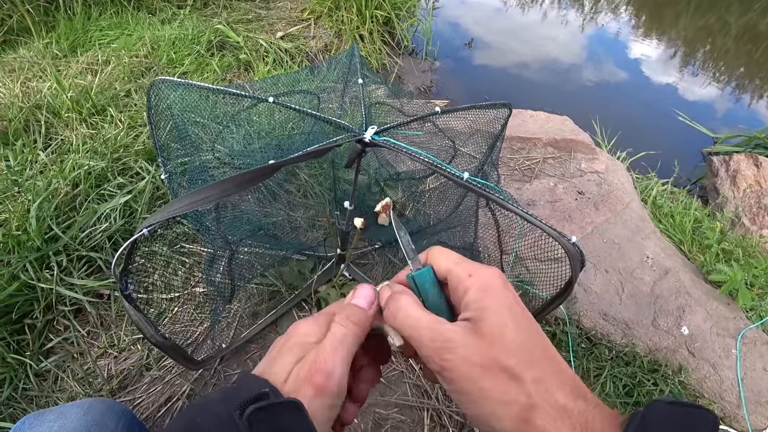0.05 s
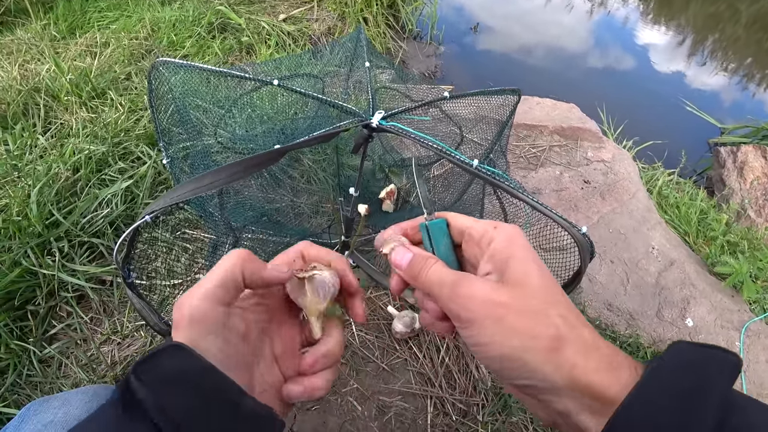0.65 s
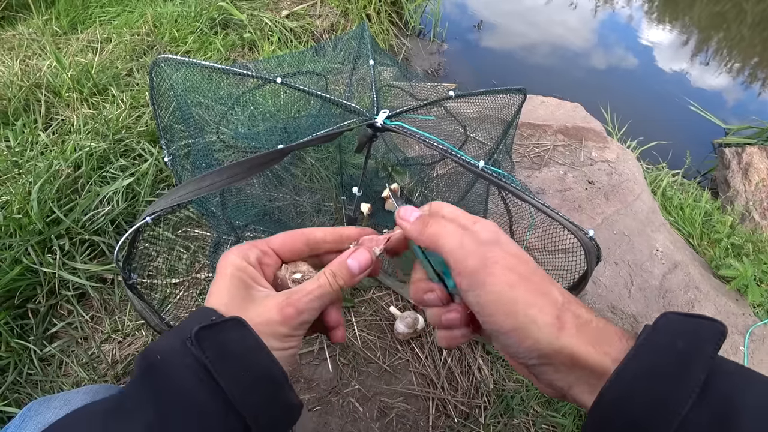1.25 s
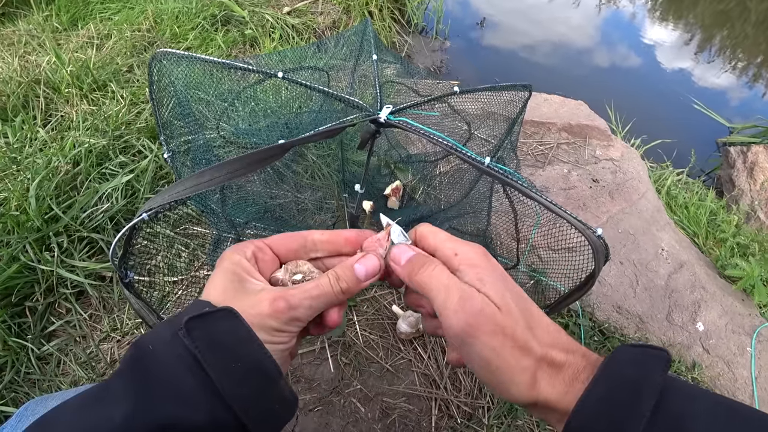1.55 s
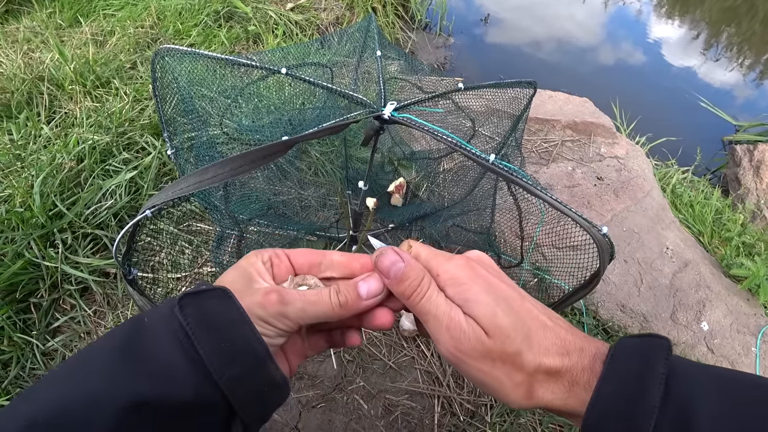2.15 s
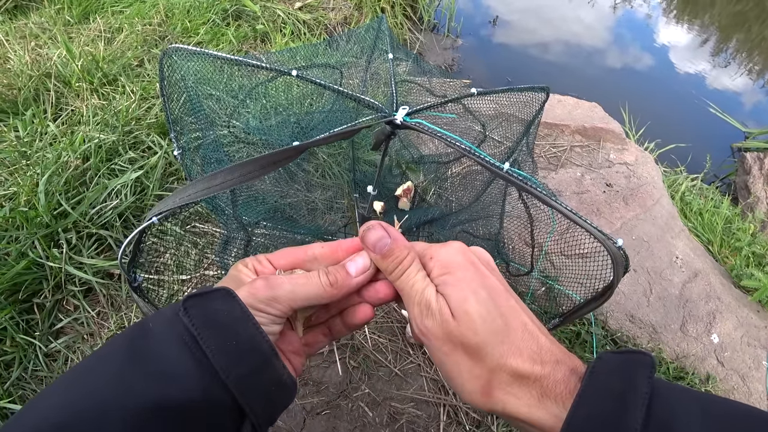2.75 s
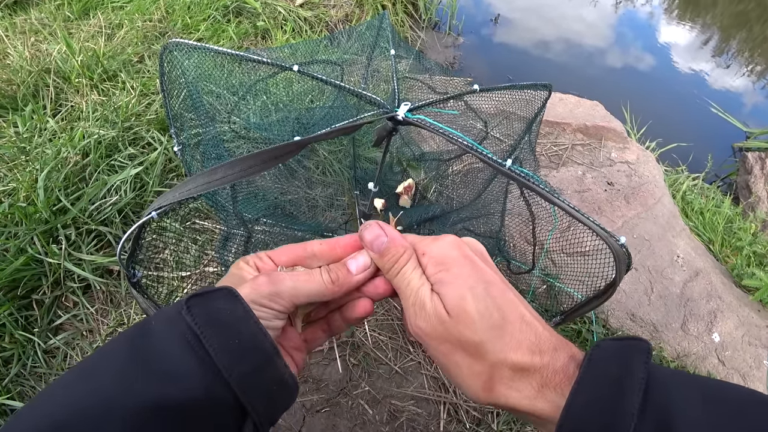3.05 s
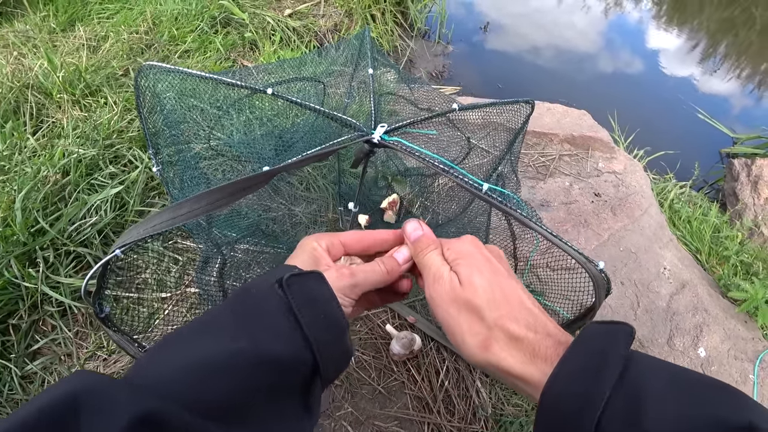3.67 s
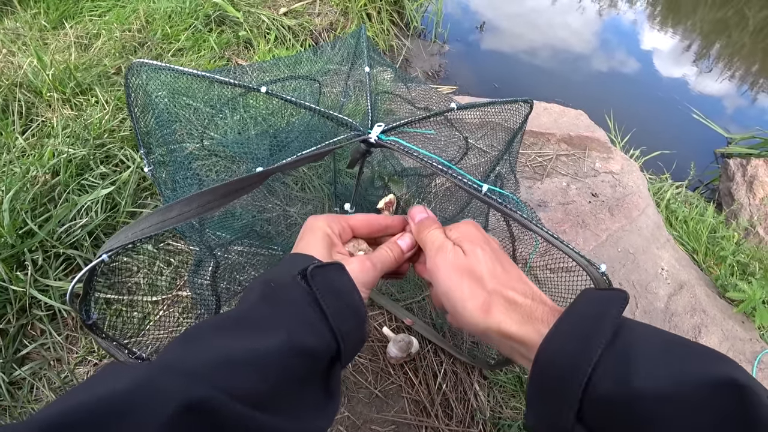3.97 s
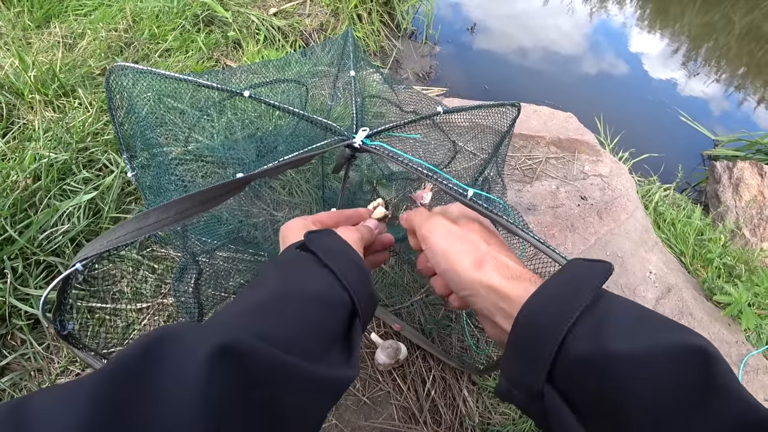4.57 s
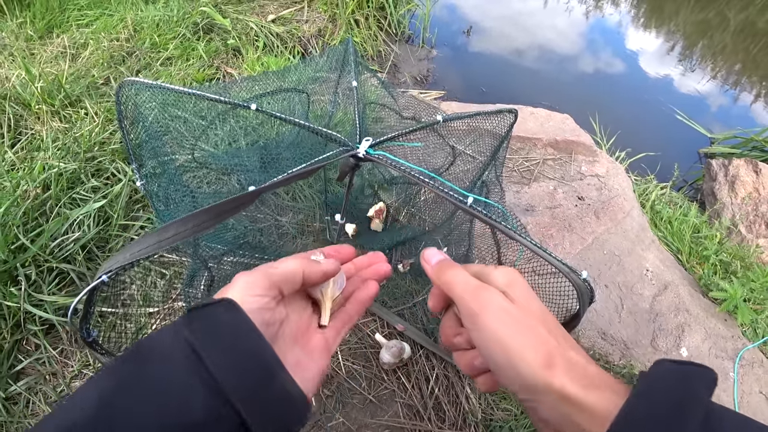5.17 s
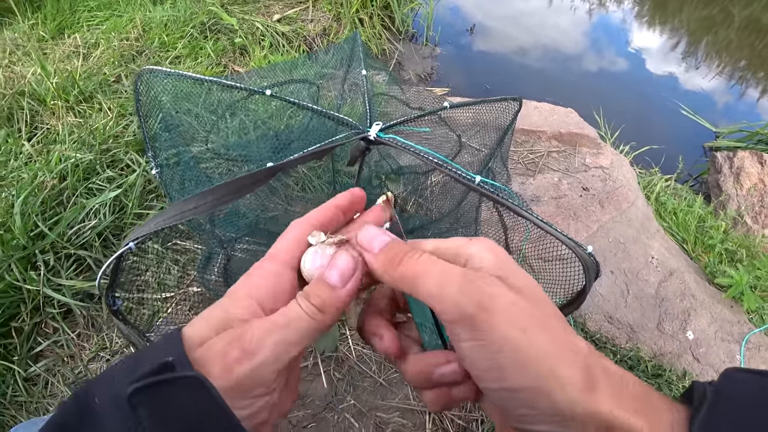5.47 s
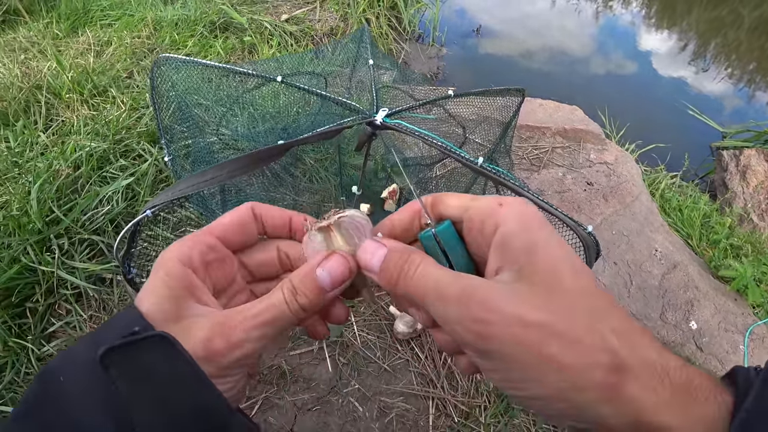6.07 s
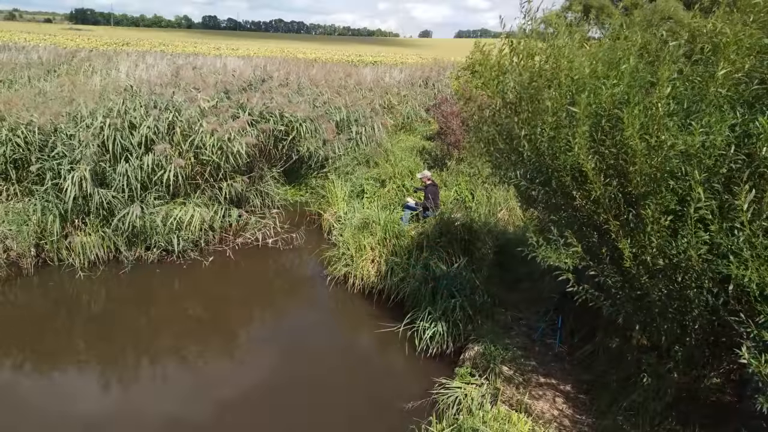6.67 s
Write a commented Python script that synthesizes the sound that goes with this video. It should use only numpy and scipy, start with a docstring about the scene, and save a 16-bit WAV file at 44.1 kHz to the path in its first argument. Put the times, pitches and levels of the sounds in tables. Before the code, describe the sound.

Dry garlic skin snaps and crackles as it is peeled with a knife close by, over rubbing jacket sleeves and light wind.

```python
"""Peeling garlic on a river bank

Garlic is peeled and cut with a small knife close to a body-worn camera. Dry skin snaps and tears
as its fibres break, the stalk rings, jacket sleeves rub and squeak, and light wind rumbles on the
microphone ports. Gain control ducks after the loudest snaps. Knocks ring the camera housing,
most of them near the end, where the handling gives way to quiet reeds."""
import sys
import numpy as np
from scipy import signal
from scipy.fft import rfft, irfft, next_fast_len
from scipy.io import wavfile
from scipy.ndimage import uniform_filter1d

SR = 44100
rng = np.random.default_rng(int(sys.argv[2]) if len(sys.argv) > 2 else 0)


def dump_mix(stems):
    """Bounce the given channels to the path in sys.argv[1] as a 16-bit WAV at rate SR."""
    frames = np.atleast_2d(stems).T  # one column per channel
    limited = np.clip(frames, -1, 1)  # hard clip at full scale
    pcm = np.round(limited * 32767).astype(np.int16)
    wavfile.write(sys.argv[1], SR, pcm)


N = 305389
TIME_S = np.arange(N) / SR


def from_db(db):
    """Decibels to gain."""
    return 10 ** (np.asarray(db) / 20)


def rms_one(x):
    """Scale to rms 1."""
    return x / np.sqrt(np.mean(x ** 2) + 1e-20)


def in_time(rows):
    """Columns of a time curve at every sample."""
    time_s, *columns = np.transpose(rows)
    return [np.interp(TIME_S, time_s, column) for column in columns]


def add(out, start_s, sound):
    """Mix a sound in from start_s."""
    start = max(round(start_s * SR), 0)
    out[..., start:start + sound.shape[-1]] += sound[..., :N - start]


def band(x, low_hz, high_hz, order=2):
    """Causal band-pass."""
    return signal.sosfilt(signal.butter(order, [low_hz, high_hz], "band", fs=SR, output="sos"), x)


def resonance(x, hz, width_hz):
    """Two-pole resonance, peak gain 1."""
    r = np.exp(-np.pi * width_hz / SR)
    feedback = [1, -2 * r * np.cos(2 * np.pi * hz / SR), r * r]
    return signal.lfilter(np.array([1, 0, -1]) * (1 - r * r) / 2, feedback, x)


def drift(rate_hz):
    """Random wander, rms 1."""
    knots = rng.standard_normal(int(N / SR * rate_hz) + 2)
    return rms_one(np.interp(TIME_S * rate_hz, np.arange(len(knots)), knots))


def coloured(x, spectrum):
    """Filter by a spectrum that rolls off past its ends; rms 1."""
    hz, db = np.transpose(spectrum)
    size = next_fast_len(N)
    bins_hz = np.maximum(np.arange(size // 2 + 1) * SR / size, 1)
    outside = np.maximum(np.maximum(hz[0] / bins_hz, bins_hz / hz[-1]), 1)
    gain = from_db(np.interp(np.log(bins_hz), np.log(hz), db)) / outside ** 2
    return rms_one(irfft(rfft(x, size) * gain, size)[..., :N])


def friction(count, slips_per_s, spread_db, hiss):
    """Tiny random slips over a smooth hiss; rms 1."""
    slips = (rng.random(count) < slips_per_s / SR) * rng.choice([-1, 1], count)
    sizes = from_db(spread_db * np.minimum(rng.exponential(1, count), 4))
    return rms_one(rms_one(slips * sizes) + hiss * rng.standard_normal(count))


def wind(trim_db=-1, flutter_db=1.5):
    """Bell-shaped gusts over a light breeze rumble on the microphone ports."""
    # gusts: peak_s, sigma_s, level_db
    gusts = [(0.135, 0.08, -43.5), (0.476, 0.041, -35), (0.737, 0.042, -43.5), (0.972, 0.037, -41.5),
             (2.65, 0.065, -39), (2.77, 0.061, -40), (2.939, 0.028, -34), (3.582, 0.092, -43.5),
             (3.88, 0.057, -37), (4.255, 0.076, -47), (4.568, .04, -45.5), (5.308, 0.064, -43),
             (5.59, 0.085, -40), (6.03, 0.17, -36.5)]
    # breeze between gusts: time_s, level_db
    breeze = [(0, -52.5), (1.6, -53.5), (3.1, -51.5), (4.9, -48.5), (6.4, -49), (6.62, -70), (6.9, -61)]
    # rumble spectrum: freq_hz, gain_db
    spectrum = [(14, 1), (24, -1), (40, -4.5), (60, -12.5), (100, -22), (180, -35), (400, -60)]
    gust_power = sum(from_db(db) ** 2 * np.exp(-((TIME_S - peak_s) / sigma_s) ** 2)
                     for peak_s, sigma_s, db in gusts)
    envelope = np.sqrt(gust_power + from_db(in_time(breeze)[0]) ** 2)
    return envelope * from_db(trim_db + flutter_db * drift(22)) * coloured(rng.standard_normal(N), spectrum)


def foliage(bank_db=-59):
    """The soft, centred hush of the grassy bank fades out, leaving reeds across the water."""
    # air over the bank: freq_hz, gain_db
    bank_spectrum = [(100, 2.5), (250, -15), (380, -1.5), (480, -15), (850, -17), (1250, -37), (1800, -11),
                     (3200, -11.5), (5000, -23), (10000, -14.5), (12000, -14), (16000, -42)]
    # reed rustle: freq_hz, gain_db
    reed_spectrum = [(60, 3), (250, 1.5), (350, -0.5), (650, -3), (1000, -7), (2500, -8.5), (4000, -10),
                     (5000, -13), (7300, -13), (9000, -18.5), (11000, -16), (13000, -19), (16000, -31)]
    # reed loudness: time_s, level_db
    reed_levels = [(6.2, -55), (6.43, -54.5), (6.55, -56), (6.7, -54.5), (6.9, -53.5)]

    def hush(spectrum, side_db):
        mid, side = coloured(rng.standard_normal((2, N)), spectrum)
        return mid + from_db(side_db) * side * [[1], [-1]]

    bank = from_db(bank_db) * np.interp(TIME_S, [6.25, 6.46], [1, 0]) * hush(bank_spectrum, side_db=-47)
    return bank + from_db(in_time(reed_levels)[0]) * hush(reed_spectrum, side_db=-18.5)


def stroke_gains(arch=0.44, fidget_bright_db=3.5):
    """Gains of rub, swish and hiss: each stroke speeds up and slows down, over constant fidgeting."""
    # sleeve and finger strokes: start_s, length_s, rub_db, swish_rel_db, hiss_rel_db
    strokes = [(0, .11, -56, 7.5, 0.5), (0.08, .1, -60, 3.5, 3.5), (0.28, 0.29, -58.5, 5, 1.5),
               (0.53, 0.26, -54.5, 1.5, -1.5), (0.982, 0.59, -60.5, 2.5, -8), (1.24, 0.11, -59.5, 4.5, 2),
               (1.9, .24, -61, 0, -6), (2.45, 0.15, -60.5, -3.5, 1.5), (3.17, 0.2, -51, 1.5, -2),
               (3.28, .26, -49.5, -1.5, -4.5), (3.638, .33, -47.5, 1, -10), (3.92, 0.29, -49.5, -3.5, -4.5),
               (4.17, 0.19, -50.5, 2.5, -2), (4.41, 0.18, -51, -3, -8), (4.931, 0.1, -46.5, -0.5, -3),
               (5.0, .25, -54, 2, 5), (5.09, .2, -47.5, 4, -3), (5.19, .42, -54.5, 1, -6),
               (5.76, 0.29, -55, -1.5, -3.5)]
    # fingers shifting on the clove: time_s, rub_db
    fidget = [(0.2, -71), (1.0, -62.5), (1.7, -68), (2.2, -72), (2.75, -72), (3.05, -77), (3.4, -63.5),
              (4.4, -63), (4.65, -71.5), (4.85, -62.5), (5.7, -64), (6.25, -70), (6.42, -69)]
    gains = from_db(in_time(fidget)[0] + np.array([[0], [fidget_bright_db], [fidget_bright_db]]))
    for start_s, length_s, rub_db, swish_rel_db, hiss_rel_db in strokes:
        during = (TIME_S > start_s) & (TIME_S < start_s + length_s)
        speed = np.abs(np.sin(np.pi * (TIME_S[during] - start_s) / length_s)) ** arch
        peaks = from_db(rub_db + np.array([[0], [swish_rel_db], [hiss_rel_db]]))
        gains[:, during] = np.hypot(gains[:, during], speed * peaks)
    return gains


def sleeves(flutter_db=1.66, tick_db=-7, side_db=-26):
    """Cloth and fingers slide: dull rub, grainy swish and fine hiss with stray ticks of dry skin."""
    # spectra of the three friction layers: freq_hz, gain_db
    rub_spectrum = [(70, 2), (130, 5), (220, -3), (300, -5), (405, 2.5), (490, -3), (740, 2.5), (1150, -1),
                    (1400, -2.5), (1700, -6.5), (2150, -7), (3000, -27)]
    swish_spectrum = [(1700, -8.5), (2500, -3), (3200, -2), (3800, 2), (4400, -2.5), (5100, -0.5),
                      (5800, 2.5), (6600, 0.5), (7500, 2.5), (9000, 0), (10500, -27)]
    hiss_spectrum = [(8000, -44), (9800, 6.5), (11500, 1), (13500, 0.5), (15500, -6), (16500, -10)]
    rub_gain, swish_gain, hiss_gain = stroke_gains()
    weave = friction(N, slips_per_s=3500, spread_db=3, hiss=1.15) * from_db(flutter_db * drift(70))
    rub = coloured(friction(N, slips_per_s=900, spread_db=2.5, hiss=1.22), rub_spectrum)
    side = from_db(side_db) * coloured(rng.standard_normal(N), rub_spectrum) * [[1], [-1]]
    ticks = rms_one(band(friction(N, slips_per_s=89, spread_db=0, hiss=0), 5600, 15000))
    hiss = coloured(weave, hiss_spectrum) + from_db(tick_db) * ticks
    out = rub_gain * (rub + side) + swish_gain * coloured(weave, swish_spectrum) + hiss_gain * hiss
    return out * np.interp(TIME_S, [6.39, 6.46], [1, 0])


def skin(force, level_db, body_rel_db, flake_hz, top_curve, hold_samples, soft_hz=9000):
    """A force rings a dry flake; each band gets the energy of its level held for hold_samples."""
    # body, lower treble, treble and top of the skin: low_hz, high_hz
    bands = [(1100, 3170), (3200, 4640), (5600, 9080), (9500, 14200)]
    lower_treble_rel_db = -1.5 + 0.58 * body_rel_db
    top_rel_db = np.interp(flake_hz, *np.transpose(top_curve))
    gains = from_db(level_db + np.array([body_rel_db, lower_treble_rel_db, 0, top_rel_db]))
    ringing = force + 0.89 * resonance(force, flake_hz, width_hz=450)
    pole = np.exp(-2 * np.pi * soft_hz / SR)
    softened = signal.lfilter([1 - pole], [1, -pole], ringing)
    parts = [band(softened, *edges_hz, order) for edges_hz, order in zip(bands, [2, 4, 4, 4])]
    return sum(gain * part * np.sqrt(hold_samples / np.sum(part ** 2)) for gain, part in zip(gains, parts))


def snaps(crack=0.82, lead_in_db=-27, lead_in_s=0.00061, echo_db=-27, echo_s=0.0048):
    """After a faint, very short hiss a fibre breaks and splinters; hands and ground echo faintly."""
    # skin breaks: break_s, treble_db (over 1 ms), splinter_ms, flake_hz, body_rel_db
    breaks = [(0.342, -23, 0.9, 9150, -7.5), (0.3583, -37, 1.6, 9700, -10),
              (0.4217, -28, 0.43, 11000, -15.5), (0.4236, -18, 1.5, 10900, -24),
              (0.4241, -12.5, 1.5, 5700, -25.5), (0.447, -24.5, 1.3, 7400, -33),
              (0.5392, -27.5, 1.6, 7700, -24), (0.5507, -33, 0.9, 6400, -25), (0.5563, -22, 1.4, 6400, -32),
              (0.564, -23, 3.4, 7500, -28), (0.5743, -25, 1.3, 7600, -24), (0.5803, -24.5, 1.1, 10520, -14),
              (0.5828, -15.5, 5.3, 5460, -16), (0.5955, -27.5, 3.5, 7000, -10), (0.603, -28, 1, 8200, -16),
              (0.7191, -34, 0.89, 11400, -16), (0.8137, -37.5, 3.4, 9700, -5.5),
              (1.1137, -29, 1.2, 7200, -30), (1.1302, -18.5, 1.2, 7300, -29), (1.669, -43, 1.5, 11000, -27),
              (1.683, -28, 3.5, 11100, -27), (2.2141, -37, 1.4, 10800, -21),
              (2.3925, -49.5, 0.5, 10000, -13), (2.467, -44, 2, 9900, -15), (2.604, -42.5, 0.7, 10400, -20),
              (2.6235, -21.5, 1.2, 9500, -18), (2.9055, -26, 0.4, 10000, -7),
              (2.9079, -27.5, 2.8, 9900, -9), (2.91, -25, 1.3, 9900, -12), (2.9209, -32, 0.9, 10000, -19),
              (3.131, -39, 3, 8400, -10), (3.2135, -29.5, 0.65, 11400, -27), (3.2657, -28, 1.3, 11100, -29),
              (3.896, -35, 2.8, 10400, -11), (3.909, -25, 1.4, 10400, -27),
              (3.9227, -23.5, 0.78, 10400, -18), (3.9355, -30.5, 1.2, 8500, -19),
              (4.0615, -36, 1.82, 8400, -21), (4.078, -36, 1, 9000, -24), (4.261, -28.5, 0.5, 7600, -22),
              (4.3047, -13.5, 0.28, 8000, -32), (4.3057, -12.5, 1.1, 6200, -24.5),
              (4.3134, -23, 1.9, 6500, -14), (4.6155, -36, 2.8, 10100, -16), (5.6612, -21, 2.4, 5940, -22),
              (5.8257, -34, 2, 7400, -22), (6.0651, -33, 0.62, 11700, -10.5),
              (6.2264, -36.5, 1.7, 10600, -9.5), (6.3344, -36.5, 0.5, 10800, -15),
              (6.3646, -36, 2.2, 7000, -8)]
    # small, high flakes give off more top: flake_hz, top_rel_db
    top_curve = [(7300, -8.5), (11500, 8.5)]
    out, lead = np.zeros(N), SR // 100
    t = np.arange(-lead, 4 * lead) / SR
    for break_s, treble_db, splinter_ms, flake_hz, body_rel_db in breaks:
        lead_in = from_db(lead_in_db) * np.exp(-np.abs(t) / lead_in_s)
        splinter = np.exp(-np.abs(t) / (splinter_ms / 1000))
        echo = from_db(echo_db) * np.exp(-np.abs(t) / echo_s)
        envelope = np.where(t < 0, lead_in, splinter + echo)
        force = envelope * friction(len(t), slips_per_s=7000, spread_db=3.5, hiss=0.88)
        force[lead] = crack * np.sqrt(np.sum(force ** 2))   # the break itself
        add(out, break_s + t[0], skin(force, treble_db, body_rel_db, flake_hz, top_curve, SR / 1000))
    return out


def stalk():
    """A break in the woody stalk leaves a short ring."""
    # stalk rings: start_s, level_db, pitch_hz, t60_s
    rings = [(0.342, -18, 3360, .011), (0.342, -24, 1960, .007), (2.624, -33, 3520, .008),
             (2.623, -36, 2040, 0.0071), (2.907, -42, 1950, .12), (3.131, -36, 3880, .02),
             (3.9076, -25, 3700, 0.013)]
    out, t = np.zeros(N), np.arange(SR // 8) / SR
    for start_s, level_db, pitch_hz, t60_s in rings:
        add(out, start_s, from_db(level_db - 60 * t / t60_s) * np.sin(2 * np.pi * pitch_hz * t))
    return out


def tears(edge_db=-16, stop_s=0.0024):
    """Skin peels in a dense run of micro-fractures that swells and dies."""
    # skin tears and blade scrapes: peak_s, swell_s, fall_s, treble_db, flake_hz, body_rel_db
    peels = [(0.362, 0.0034, .012, -43, 7700, -15), (0.434, 0.0066, 0.022, -34, 7900, -21),
             (0.588, .035, 0.024, -29.5, 6100, -15), (0.679, .01, .012, -49, 6200, -6),
             (0.72, .008, .014, -45, 9800, -17), (0.763, 0.015, .011, -39.5, 7640, -24),
             (0.812, 0.013, .01, -39, 10200, -12), (0.869, 0.015, 0.029, -40, 7800, -21),
             (1.033, 0.024, 0.035, -42, 7200, -17), (1.131, 0.029, 0.02, -35, 7100, -28),
             (1.681, 0.02, 0.026, -35.5, 10200, -19.5), (1.788, 0.013, .018, -55.5, 10600, -18),
             (1.93, 0.014, 0.018, -56.5, 10600, -20), (2.914, 0.0057, 0.065, -42.5, 10100, -9),
             (3.152, .04, 0.057, -42.5, 9900, -9.5), (3.911, 0.012, 0.014, -33, 7850, -11),
             (5.6, 0.039, .01, -49, 10600, -13), (5.827, .013, 0.028, -43, 7000, -25),
             (6.034, .025, 0.041, -48, 8300, -26), (6.068, .009, 0.024, -46, 10300, -13),
             (6.159, 0.035, 0.029, -42.5, 8450, -14), (6.212, 0.02, .014, -44, 10200, -25),
             (6.31, 0.03, 0.04, -46.5, 7650, -13), (6.352, .027, 0.081, -43, 7400, -12.5)]
    # brightness by flake pitch: flake_hz, top_rel_db
    top_curve = [(6200, -8), (8000, -1), (10600, 5)]
    out = np.zeros(N)
    for peak_s, swell_s, fall_s, treble_db, flake_hz, body_rel_db in peels:
        t = np.arange(SR // 6) / SR - swell_s
        pull = from_db(np.interp(t, [-swell_s, 0, fall_s], [edge_db, 0, edge_db]))
        pull *= np.exp(-np.maximum(t - fall_s, 0) / stop_s)
        force = pull * friction(len(t), slips_per_s=1600, spread_db=3, hiss=0.95)
        tear = skin(force, treble_db, body_rel_db, flake_hz, top_curve, np.sum(pull ** 2))
        add(out, peak_s - swell_s, tear)
    return out


def knocks(trim_db=4, vary_db=2.5, onset_s=0.00019):
    """The camera housing rings briefly; a sideways knock drives the two microphones out of phase."""
    # knocks on the camera: start_s, level_db, contact_hz
    hits = [(0.424, -41.5, 150), (4.700, -37, 700), (4.825, -40, 700), (5.210, -33, 600),
            (5.787, -42.5, 120), (6.363, -43, 2500), (6.413, -38.5, 404), (6.502, -28.5, 915),
            (6.627, -30.5, 1000), (6.646, -36, 700), (6.657, -34.5, 700), (6.685, -33.5, 700),
            (6.726, -34, 800), (6.833, -35.5, 2500), (6.886, -29, 1000), (6.909, -33, 700)]
    # housing modes: pitch_hz, gain_db, t60_s
    modes = [(150, -4, 0.021), (360, 1, 0.029), (730, -1.5, 0.027), (1150, -2.5, 0.0095), (1710, -1, 0.01),
             (3300, 7, 0.0039)]
    # late knocks come from the side: time_s, phase_between_mics_deg
    sideways = [(6.31, 0), (6.52, 127)]
    out, t = np.zeros((2, N)), np.arange(SR // 20) / SR
    for start_s, level_db, contact_hz in hits:
        shift_rad = np.radians(np.interp(start_s, *np.transpose(sideways))) / 2 * np.array([[1], [-1]])
        ring = np.zeros((2, len(t)))
        for k, (pitch_hz, gain_db, t60_s) in enumerate(modes):
            decay = from_db(gain_db + vary_db * rng.standard_normal() - 60 * t / t60_s)
            drive = (-1) ** k / np.hypot(1, pitch_hz / contact_hz)   # soft contact dulls high modes
            ring += drive * decay * np.sin(2 * np.pi * pitch_hz * t + shift_rad)
        ring *= 1 - np.exp(-t / onset_s)
        add(out, start_s, ring * from_db(level_db + trim_db) / np.abs(ring).max())
    return out


def squeaks(creak_s=3.864, creak_sigma_s=0.0055):
    """Stick-slip of cloth sings in one resonance; a sleeve rubbing on the camera creaks in several."""
    # cloth squeaks and scuffs: peak_s, sigma_s, pitch_hz, width_hz, level_db
    scuffs = [(1.286, 0.098, 790, 250, -57.5), (3.567, 0.0018, 3800, 600, -48),
              (3.76, 0.057, 140, 56, -50.5), (4.295, 0.016, 88, 52.3, -44.5),
              (4.514, 0.019, 119, 168, -46.5), (4.846, 0.0075, 2880, 500, -47.5),
              (4.851, .0067, 3870, 360, -43.5), (5.151, .05, 970, 340, -52),
              (5.351, 0.046, 730, 270, -49.5)]
    # creak resonances: pitch_hz, width_hz, level_db
    creak_modes = [(410, 30, -42.5), (687, 35, -31), (1064, 83, -35), (1370, 120, -41)]
    creak = [(creak_s, creak_sigma_s, *mode) for mode in creak_modes]
    out, t = np.zeros(N), np.arange(-SR // 10, SR // 10) / SR
    for peak_s, sigma_s, pitch_hz, width_hz, level_db in scuffs + creak:
        swell = np.exp(-(t / sigma_s) ** 2 / 2)
        tone = resonance(rng.standard_normal(len(t)), pitch_hz, width_hz)
        squeak = swell * resonance(tone, pitch_hz, 2 * width_hz)
        add(out, peak_s + t[0], from_db(level_db) * rms_one(squeak) * np.sqrt(np.mean(swell ** 2)))
    return out


def cuff(unevenness=0.16, overtone=0.43, flutter_db=3.6):
    """Threads catch at an uneven, rising rate: a short rough zip."""
    # cuff sliding over its weave: time_s, threads_per_s, level_db
    slide = [(4.9, 68, -77), (4.93, 109, -50), (4.955, 188, -48.5), (4.975, 395, -44.5),
             (4.995, 520, -47.5), (5.02, 530, -62), (5.05, 790, -90)]
    threads_per_s, level_db = in_time(slide)
    phase = 2 * np.pi * np.cumsum(threads_per_s * np.exp(unevenness * drift(500))) / SR
    buzz = (np.sin(phase) + overtone * np.sin(2 * phase)) * from_db(flutter_db * drift(200))
    during = (TIME_S > slide[0][0]) & (TIME_S < slide[-1][0])
    return during * from_db(level_db) * rms_one(buzz)


def scene():
    """Hands work straight in front of the microphones, amid wind and foliage."""
    return snaps() + stalk() + tears() + squeaks() + cuff() + sleeves() + knocks() + wind() + foliage()


def record(dry, threshold_db=-19, release_db_per_s=55, late_s=0.0074, attack_s=0.0019, cutoff_hz=15850):
    """Gain control ducks late after a loud snap and recovers slowly; the top is cut."""
    power = np.maximum(uniform_filter1d(dry.mean(axis=0) ** 2, size=88), 1e-12)
    over_db = np.maximum(10 * np.log10(power) - threshold_db, 0)
    release_db = release_db_per_s * TIME_S
    held_db = np.maximum.accumulate(over_db + release_db) - release_db
    pole = np.exp(-1 / (attack_s * SR))
    duck_db = signal.lfilter([1 - pole], [1, -pole], np.interp(TIME_S - late_s, TIME_S, held_db))
    lowpass = signal.ellip(10, .2, 85, cutoff_hz, fs=SR, output="sos")
    return signal.sosfilt(lowpass, np.clip(dry * from_db(-duck_db), -1, 1))


dry = scene()
out = record(dry)
dump_mix(out)
```